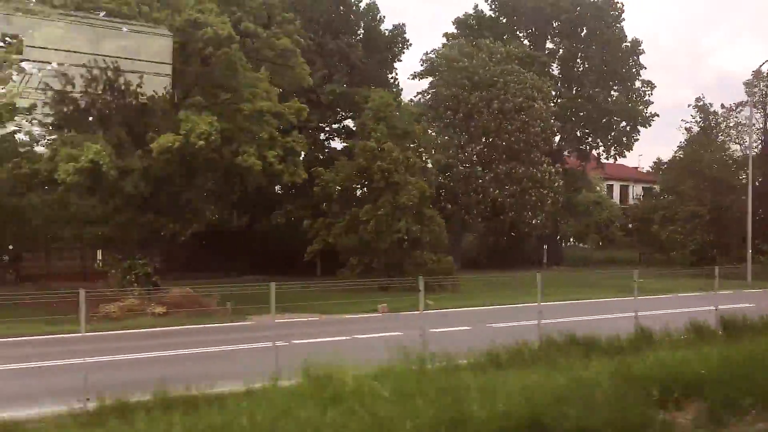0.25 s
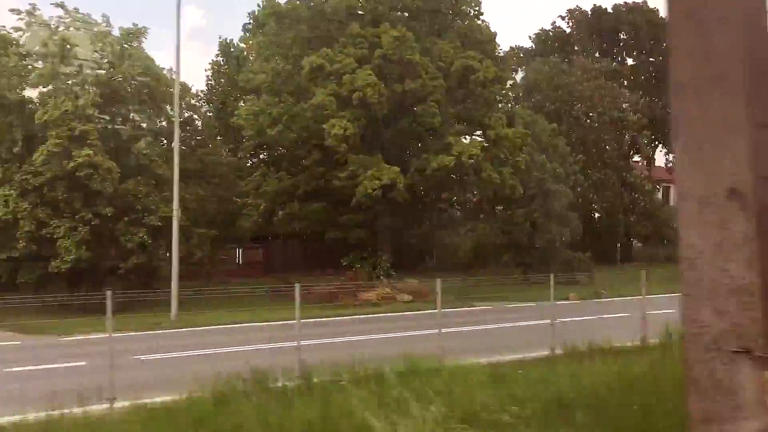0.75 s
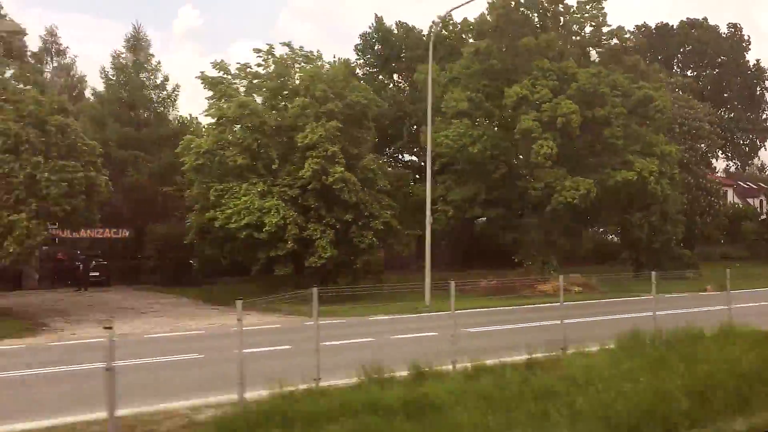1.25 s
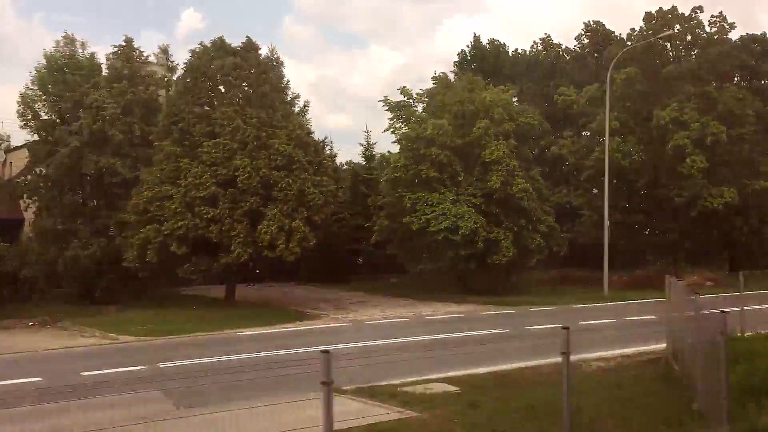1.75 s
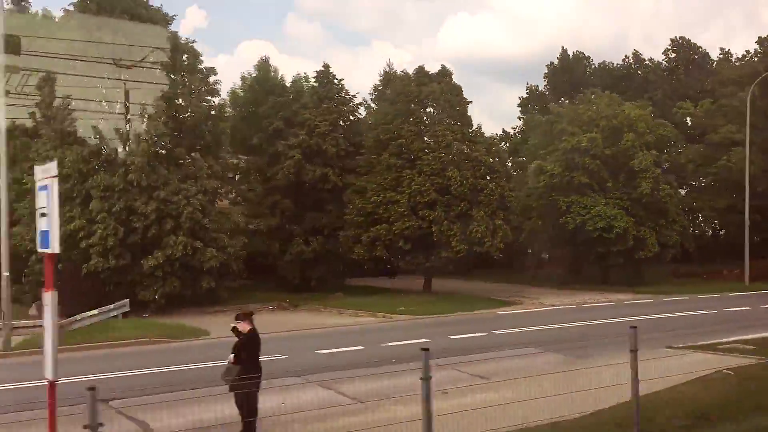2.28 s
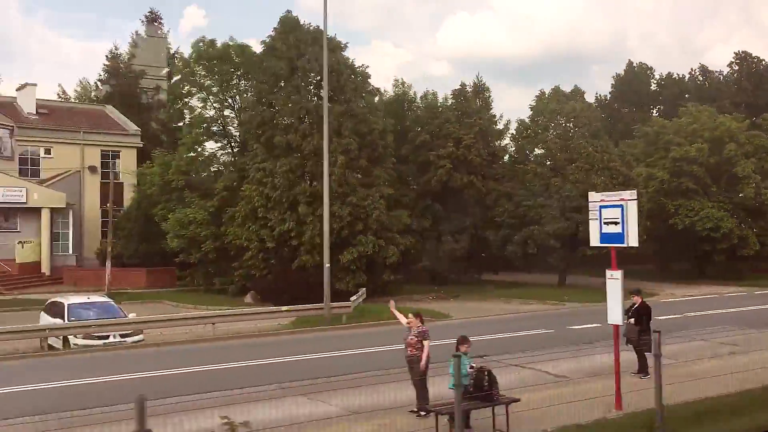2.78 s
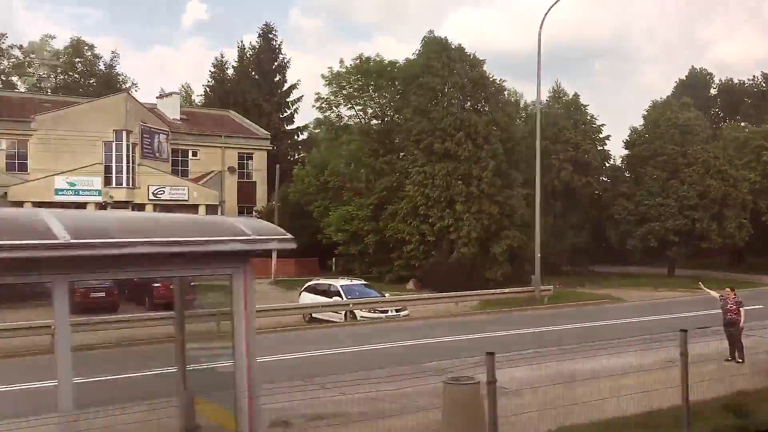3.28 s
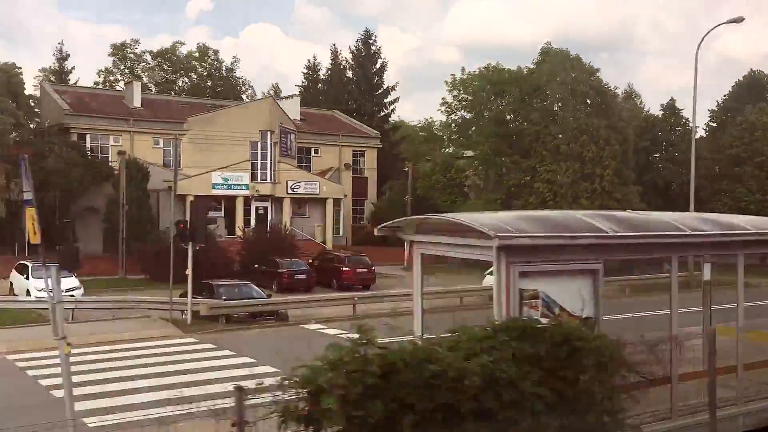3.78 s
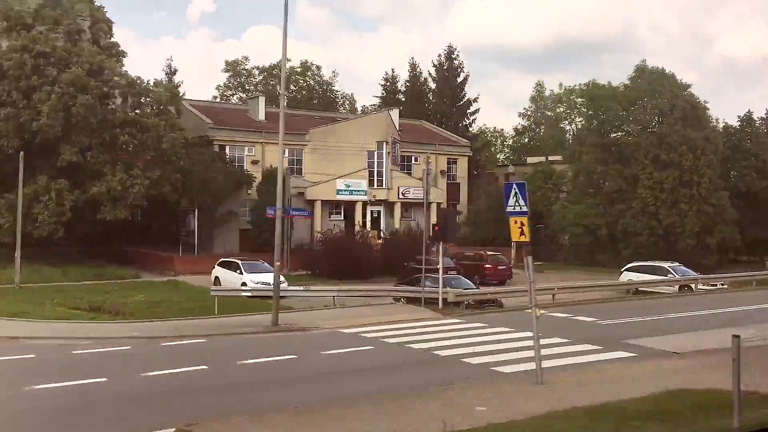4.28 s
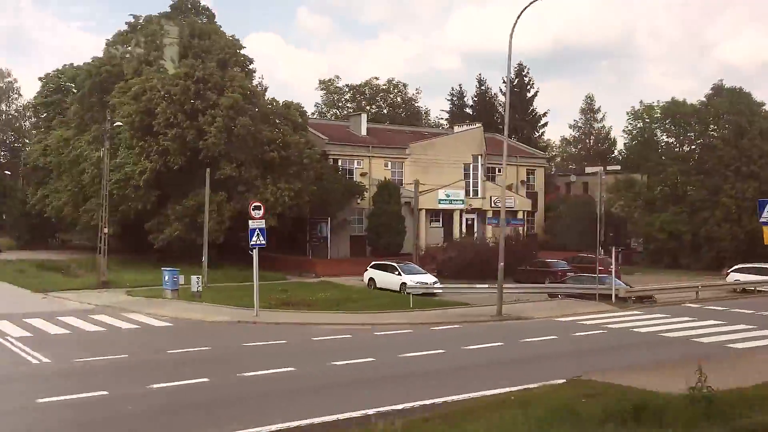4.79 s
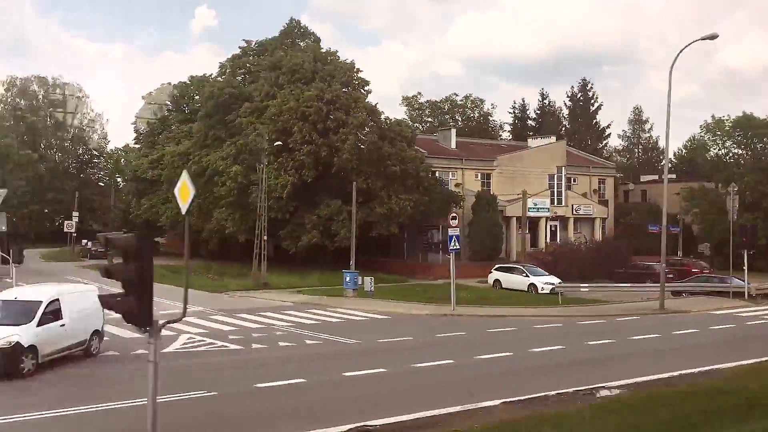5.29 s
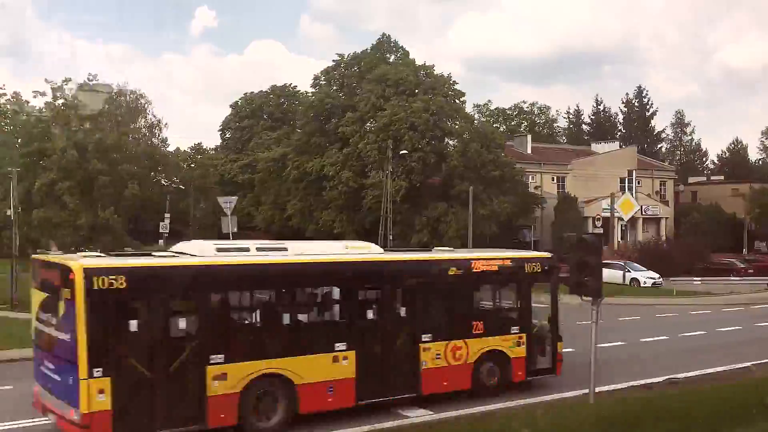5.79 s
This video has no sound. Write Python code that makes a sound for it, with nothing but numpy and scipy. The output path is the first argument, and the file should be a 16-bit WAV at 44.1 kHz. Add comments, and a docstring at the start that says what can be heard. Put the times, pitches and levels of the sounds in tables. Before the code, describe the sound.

Inside a passenger train running at steady speed, a deep wheel rumble and a softer airy roar continue for about six seconds. A mid-pitched gear hum holds one note, gently swelling and fading. Dull thumps from the rails come through the floor at uneven intervals, roughly three a second, many of them doubled. Faint bright ticks and a soft swish occur around 1 second, with another tick near 2.4 seconds. At about 3.7 seconds a metal fitting creaks and gives a thin, high squeak. It snaps shut at 3.8 seconds with a sharp crack, a brief metallic ring and hollow knocks, followed immediately by another squeak and a small creak. The thumps pause briefly and return around 4.5 seconds. A clearer swish passes at 5 seconds, with softer ones and faint ticks near the end as the rumble continues.

```python
"""Inside a passenger coach running at steady speed. Rough rail makes the wheels rumble through the floor and
sets the coach ringing, while a steady tone hums near 730 Hz. There are a few soft swishes and small bright
ticks, and bumps in the rail thump through the floor. A little past halfway, a metal fitting squeaks and creaks
as it sticks and slips, and snaps shut."""
import sys
import numpy as np
from scipy import signal
from scipy.fft import rfft, irfft, next_fast_len
from scipy.io import wavfile

SR = 44100
rng = np.random.default_rng(int(sys.argv[2]) if len(sys.argv) > 2 else 0)


def inscribe(sig):
    """Save sig as 16-bit PCM at rate SR to the path in sys.argv[1].

    A 1-D sig is mono; a 2-D sig holds one channel per row.
    Samples are clipped to [-1, 1] before scaling.
    """
    pcm = np.round(np.clip(np.atleast_2d(sig).T, -1, 1) * 32767)
    wavfile.write(sys.argv[1], SR, pcm.astype(np.int16))


N = 266805
TIME = np.arange(N) / SR


def from_db(db):
    """Turn decibels into a number to multiply a sound by."""
    return 10 ** (np.asarray(db) / 20)


def rms_one(x):
    """Scale a sound so that its average strength (rms) is 1."""
    return x / np.sqrt(np.mean(x ** 2) + 1e-20)


def in_time(points):
    """Join (time, value) points with straight lines."""
    times, values = np.transpose(points)
    return np.interp(TIME, times, values)


def at_hz(points, hz):
    """Read between (frequency, value) points, with every octave equally wide."""
    frequencies, values = np.transpose(points)
    return np.interp(np.log(hz), np.log(frequencies), values)


def noise(colour):
    """Noise shaped by a (frequency, level) table, fading steeply past both ends; rms 1."""
    hz = np.maximum(np.fft.rfftfreq(2 * N, 1 / SR), 1)
    low_cut = 1 + (colour[0][0] / hz / np.sqrt(2)) ** 8
    high_cut = 1 + (hz / colour[-1][0] / 2) ** 8
    shape = from_db(at_hz(colour, hz)) / np.sqrt(low_cut * high_cut)
    size = next_fast_len(N)
    gain = np.interp(np.fft.rfftfreq(size, 1 / SR), hz, shape)
    return rms_one(irfft(rfft(rng.standard_normal(size)) * gain, size)[:N])


def drift(rate_hz):
    """A smooth random wobble of typical size 1; a higher rate wobbles faster."""
    step, warm_up = 40, 2000
    r = np.exp(-2 * np.pi * step * rate_hz / SR)
    slow = signal.lfilter([1], [1, -2 * r, r * r], rng.standard_normal(N // step + warm_up + 2))[warm_up:]
    return np.interp(np.arange(N) / step, np.arange(len(slow)), rms_one(slow))


def resonate(x, hz, width):
    """Make a sound ring at one pitch; the smaller the width, the longer it rings."""
    r = np.exp(-np.pi * width / SR)
    feedback = [1, -2 * r * np.cos(2 * np.pi * hz / SR), r * r]
    return signal.lfilter(np.array([1, 0, -1]) * (1 - r * r) / 2, feedback, x)


def rising(start, rise):
    """Climb from 0 to 1 in `rise` seconds, then stay there."""
    return np.clip((TIME - start) / rise, 0, 1)


def dying(start, fade):
    """Jump to 1 at `start`, then die away. A fade time is how long it takes to drop 60 dB."""
    return (TIME >= start) * np.exp(-np.minimum(np.log(1000) * np.abs(TIME - start) / fade, 40))


def boom(start, hz, width):
    """A blow passed through two linked resonances: the note swells, then dies."""
    age = np.clip(TIME - start, 0, 1)
    swell = np.pi * width * age
    return swell * np.exp(1 - swell) * np.sin(2 * np.pi * hz * age)


# How loudly the rough track rumbles: (time [s], level [dB])
RUMBLE_LEVELS = [(0, -35.5), (1, -36), (2.4, -32), (3.4, -35), (4.5, -36), (5.2, -32), (5.7, -36.5)]
# The deep rumble in the floor: (frequency [Hz], relative level [dB])
RUMBLE_COLOUR = [(12, -35), (24, -11.5), (42, -0.5), (62, -2.5), (85, 4), (140, -2.5), (195, -8),
                 (250, -15.5), (300, -23.5), (450, -28)]
# The roar in the air: (frequency [Hz], relative level [dB])
ROAR_COLOUR = [(250, -26), (440, -6), (600, 2), (720, -1), (850, 0), (970, -8), (1600, -10.5), (2050, -13),
               (3100, -18), (4500, -24.5), (5100, -28.5), (6000, -25.5), (7500, -31.5), (8800, -31),
               (10600, -36), (12000, -33.5), (15700, -39)]
# The notes the coach rings at: (pitch [Hz], width [Hz], level [dB])
COACH_NOTES = [(108, 15, -37.5), (127.6, 26, -39.5), (185.6, 25, -51), (339.7, 26.5, -59),
               (387.3, 21, -61.5), (430, 18, -61.5), (507.4, 20, -58.5), (555.3, 16.7, -55),
               (620.9, 12.5, -52.5), (652.7, 19, -58.5), (688.6, 11, -54.5), (702.5, 19, -51),
               (731.6, 10.1, -47), (745.2, 16, -53), (785, 13.6, -52), (907, 23, -65.5), (1031, 33, -63.5),
               (1187, 14, -69.5), (1384, 13, -68.5), (1490, 18, -70), (1553, 31, -66.5), (1730, 64, -67.5),
               (2313, 58, -68.5), (3092, 84, -73.5), (4745, 53, -81.5)]

def rolling(roar_db=-48.8, rumble_sway_db=0.8, roar_sway_db=0.33):
    """Wheels on rough rail rumble through the floor, roar through the air and make the coach ring."""
    rumble = from_db(in_time(RUMBLE_LEVELS) + rumble_sway_db * drift(2.5)) * noise(RUMBLE_COLOUR)
    roar = from_db(roar_db + roar_sway_db * drift(5.6)) * noise(ROAR_COLOUR)
    ringing = 0
    for hz, width, db in COACH_NOTES:
        shaken = resonate(rng.standard_normal(N + SR), hz, 2 * width)
        note = resonate(shaken, hz, width)[SR:]   # skip a second so it is already ringing
        ringing += from_db(db) * rms_one(note)
    return rumble + roar + ringing


# The slow swell of the hum: (time [s], relative level [dB])
HUM_LEVELS = [(0, -46), (1.2, -42), (2.1, -41), (2.7, -46), (3.5, -48), (3.9, -41.5), (4.9, -41),
              (5.35, -47), (5.65, -37), (6.05, -42)]

def steady_hum(pitch_hz=728.3, waver_hz=1.3, gain_db=-2.0, flutter=0.39):
    """A steady tone hums near 730 Hz; the ride shakes its loudness at random."""
    phase = 2 * np.pi * np.cumsum(pitch_hz + waver_hz * drift(11.85)) / SR
    level = from_db(in_time(HUM_LEVELS) + gain_db)
    shake = 1 + flutter * drift(7)
    return np.sqrt(2) * level * shake * np.sin(phase)


# Each passing swish: (start [s], rise time [s], level [dB], fade time [s])
SWISH_EVENTS = [(.92, .15, -53.5, .8), (4.1, .2, -62, .8), (4.992, .085, -44, .95), (5.45, .22, -59, 1.2),
                (5.88, 0.066, -49, 1.5)]
# The hiss they are made of: (frequency [Hz], relative level [dB])
HISS_COLOUR = [(450, -3.5), (1000, 2), (1500, -2.5), (2300, 1), (2900, 2), (4000, -5.5), (5100, -13),
               (6600, -9.5), (8000, -16.5), (12500, -25), (15500, -35)]

def swishes(treble_hz=6000, dulling=0.35):
    """Soft hiss that swells and dies away; the weaker it is, the duller it sounds."""
    level = 0
    for start, rise, db, fade in SWISH_EVENTS:
        peak_time = start + rise
        level += from_db(db) * rising(start, rise) * ((TIME < peak_time) + dying(peak_time, fade))
    hiss = noise(HISS_COLOUR)
    treble = signal.sosfiltfilt(signal.butter(2, treble_hz, "high", fs=SR, output="sos"), hiss)
    brightness = (level / level.max()) ** dulling
    return level * (hiss - (1 - brightness) * treble)


# Small bright ticks, plus the fading hiss of the fitting's creak at 3.666 s: (time [s], level [dB])
TICK_EVENTS = [(0.8345, -51), (1.063, -53), (2.443, -54), (3.666, -55), (5.0035, -55), (5.548, -54.5)]
# The bright noise they are made of: (frequency [Hz], relative level [dB])
TICK_COLOUR = [(1500, 6), (4500, -11), (6100, 1.5), (7600, -5.5), (12500, -4), (15500, -8)]

def ticks(fade_s=0.032, tail_db=-7, tail_fade_s=0.4):
    """Ticks of loose trim and the creak's fading hiss, each with a short echo from the coach walls."""
    level = 0
    for start, db in TICK_EVENTS:
        level += from_db(db) * (dying(start, fade_s) + from_db(tail_db) * dying(start, tail_fade_s))
    return level * noise(TICK_COLOUR)


# Wheels hitting bumps: (time [s], level of the floor's boom [dB], rebound strength [0-1])
RAIL_BUMPS = [(0.179, -20, 0), (0.509, -16.5, 0.95), (0.707, -16, .85), (1.058, -18, 0), (1.288, -18, 0.74),
              (1.612, -18.5, 0), (1.852, -12.5, 0), (2.2, -15.5, 0.27), (2.625, -18.5, 0),
              (3.02, -24.5, 0.1), (3.184, -16, 0.05), (3.52, -18.5, 0.85), (3.688, -18, 0.44),
              (4.519, -22, 0.1), (4.76, -15.5, 0), (5.079, -19, .65), (5.289, -18, .5), (5.388, -14, .45),
              (5.808, -15, 0.62)]

def wheel_thumps(rebound_s=0.041):
    """The springs let only the low part of each bump into the coach. Many bumps rebound once."""
    def blow(start):
        """The floor booms, a wall panel answers and the whole coach bounces."""
        floor = boom(start, hz=113, width=29)
        panel = from_db(-15) * boom(start, hz=185, width=36)
        bounce = from_db(-18) * boom(start, hz=47, width=12)
        return floor + panel + bounce
    return sum(from_db(db) * (blow(start) + rebound * blow(start + rebound_s))
               for start, db, rebound in RAIL_BUMPS)


# The metal fitting's squeaks: (start [s], level [dB], rise time [s], fade time [s])
FITTING_SQUEAKS = [(3.648, -42.5, 0.0094, 0.26), (3.86, -45, .005, 0.33)]

def squeaks(pitch_hz=7365, waver_hz=45, rough_db=5.0):
    """Dry metal slips and rings at one high, slightly shaky pitch."""
    phase = 2 * np.pi * np.cumsum(pitch_hz + waver_hz * drift(227)) / SR
    roughness = from_db(rough_db * drift(95))
    level = sum(from_db(db) * rising(start, rise) * dying(start, fade)
                for start, db, rise, fade in FITTING_SQUEAKS)
    return level * roughness * np.sin(phase)


# The fitting's creaks: (start [s], length [s], level [dB], pitch [Hz], width [Hz])
FITTING_CREAKS = [(3.658, .05, -31, 321, 56), (3.932, 0.093, -42, 1010, 330),
                  (3.656, 0.04, -61, 12000, 9600)]

def creaks(slips_per_s=5000):
    """Metal sticks and slips in runs of tiny jerks; each run rings one part of the fitting."""
    out = 0
    for start, length, db, hz, width in FITTING_CREAKS:
        slips = (rng.random(N) < slips_per_s / SR) * rng.choice([-1, 1], N) + 1e-18
        ringing = resonate(resonate(slips, hz, 2 * width), hz, width)
        stroke = np.sin(np.pi * rising(start, length))
        out += from_db(db) * stroke * rms_one(ringing)
    return out


# The noise of the snap's crack and its echo: (frequency [Hz], relative level [dB])
SNAP_COLOUR = [(200, 10), (850, -1.5), (1200, -3.5), (2000, -8.5), (3200, -10.5), (3750, -3.5), (4150, -14),
               (4650, -7), (5100, -13.5), (6400, -14), (7700, -17.5), (11000, -24), (13100, -21),
               (15500, -27)]
# How long that echo lasts in the coach: (frequency [Hz], fade time [s])
ECHO_FADES = [(200, 0.51), (1000, 0.5), (4000, 0.29), (8000, 0.39), (15000, 0.2)]
# The notes the struck fitting rings at: (pitch [Hz], level [dB], fade time [s])
FITTING_NOTES = [(853, -34.5, 0.35), (942, -43, 0.39), (1522, -41, 0.23), (1970, -40.5, .14),
                 (2510, -46, .12), (2970, -47, 0.18), (3750, -37, 0.11), (3790, -38.5, 0.1),
                 (4404, -49, .17), (4640, -42.5, 0.1), (5857, -49, .12), (6500, -47, .09),
                 (8500, -52.5, .15), (12850, -41, .05), (13300, -37.5, 0.034)]
# Its hollow knocks around the snap: (time [s], level [dB], pitch [Hz], width [Hz])
FITTING_KNOCKS = [(3.662, -31, 324, 69), (3.839, -29.5, 252, 22), (3.841, -34.5, 327, 25),
                  (3.864, -23.5, 54, 32), (3.935, -25.5, 54, 15), (3.934, -35, 213, 67)]

def snap(snap_s=3.8305, noise_db=-31.5, crack_boost_db=6, crack_above_hz=4200):
    """The fitting snaps shut: a bright crack, ringing metal, knocks and an echo that loses treble first."""
    burst = noise(SNAP_COLOUR)
    edges_hz = np.geomspace(150, 17000, 9)
    echo = 0
    for low, high in zip(edges_hz, edges_hz[1:]):
        band = signal.sosfiltfilt(signal.butter(2, [low, high], "band", fs=SR, output="sos"), burst)
        echo += band * dying(snap_s, at_hz(ECHO_FADES, np.sqrt(low * high)))
    keep_treble = signal.butter(2, crack_above_hz, "high", fs=SR, output="sos")
    bright = signal.sosfilt(keep_treble, noise(SNAP_COLOUR))
    crack = from_db(crack_boost_db) * bright * dying(snap_s, fade=0.02)
    ringing = sum(from_db(db) * dying(snap_s, fade) * np.sin(2 * np.pi * hz * (TIME - snap_s))
                  for hz, db, fade in FITTING_NOTES)
    knocks = sum(from_db(db) * boom(start, hz, width) for start, db, hz, width in FITTING_KNOCKS)
    contact = rising(snap_s, rise=0.0006)   # the catch takes a moment to settle into place
    return contact * (from_db(noise_db) * (echo + crack) + ringing) + knocks


def scene():
    """Everything as heard from a window seat, in one channel."""
    fitting = squeaks() + creaks() + snap()
    return (rolling() + wheel_thumps() + steady_hum() + fitting + ticks() + swishes())[None]


def record(dry):
    """Cut away the very highest treble."""
    cutoff_hz = 15650
    return signal.sosfilt(signal.ellip(12, 0.1, 90, cutoff_hz, fs=SR, output="sos"), dry)


dry = scene()
out = record(dry)
inscribe(out)
```